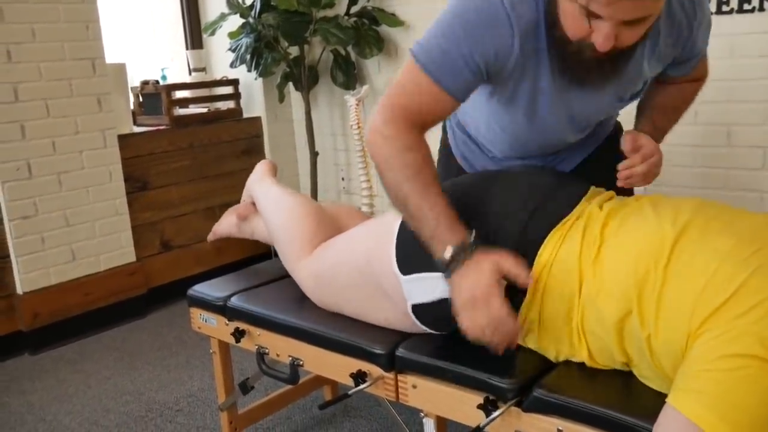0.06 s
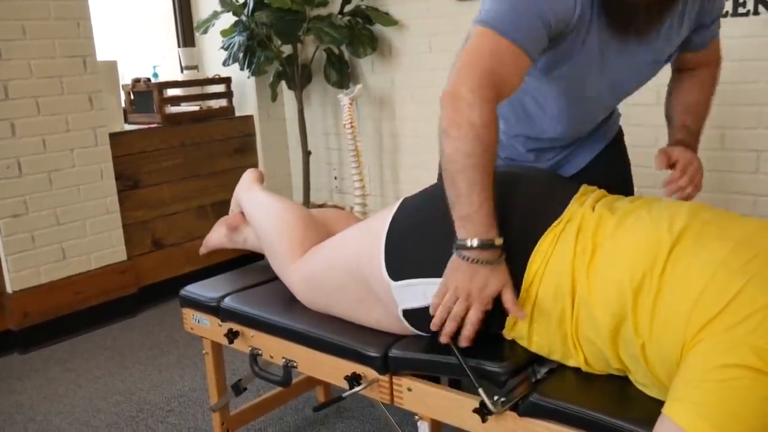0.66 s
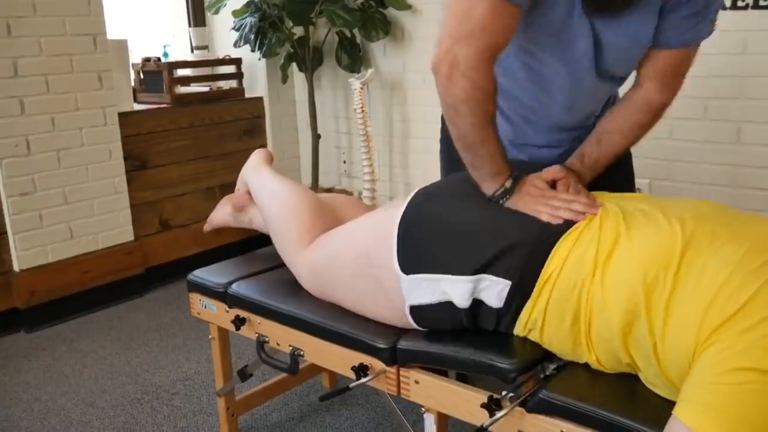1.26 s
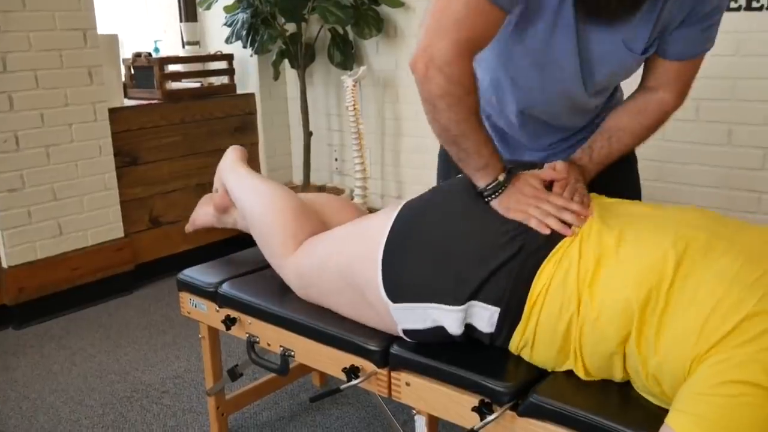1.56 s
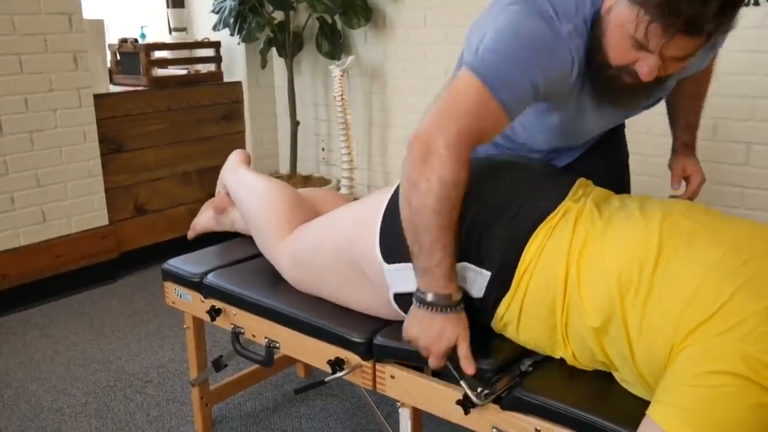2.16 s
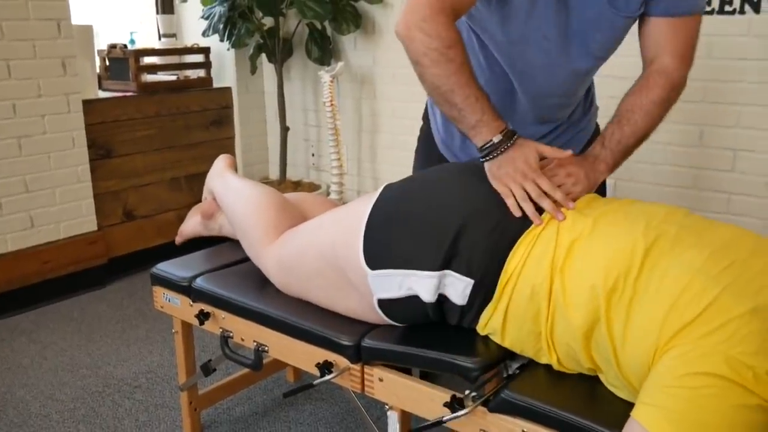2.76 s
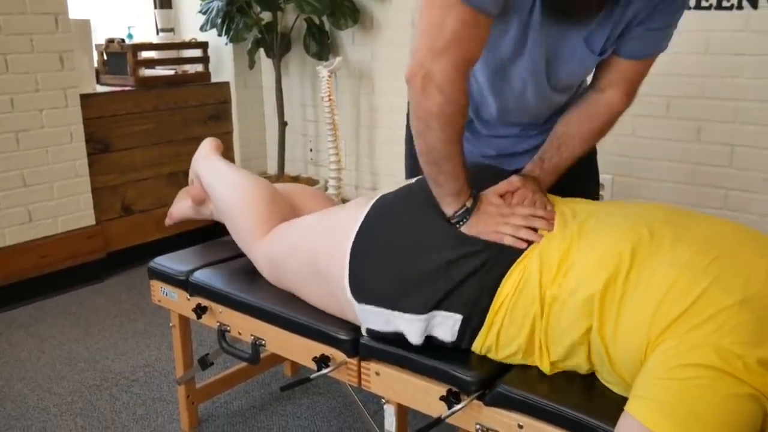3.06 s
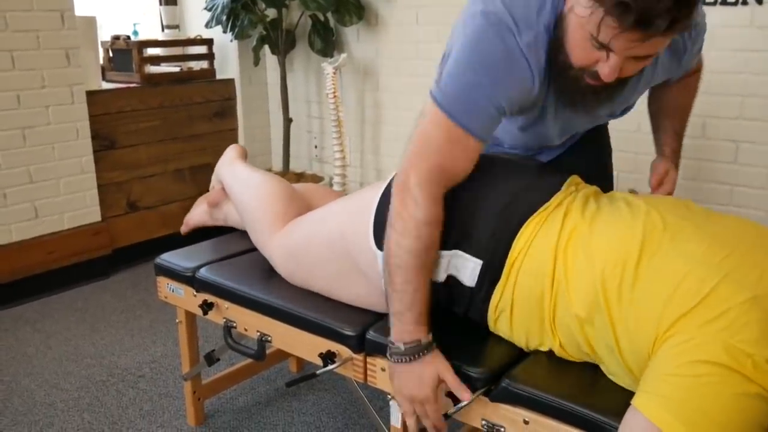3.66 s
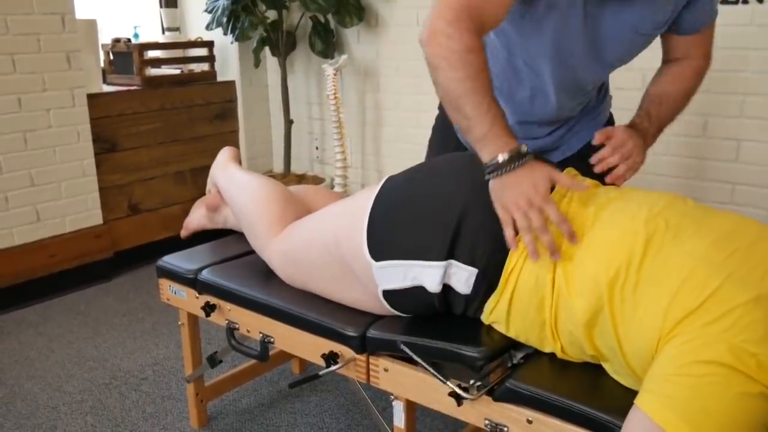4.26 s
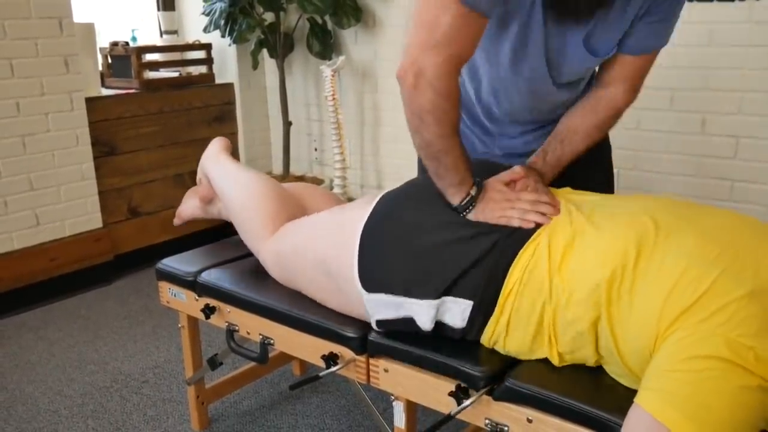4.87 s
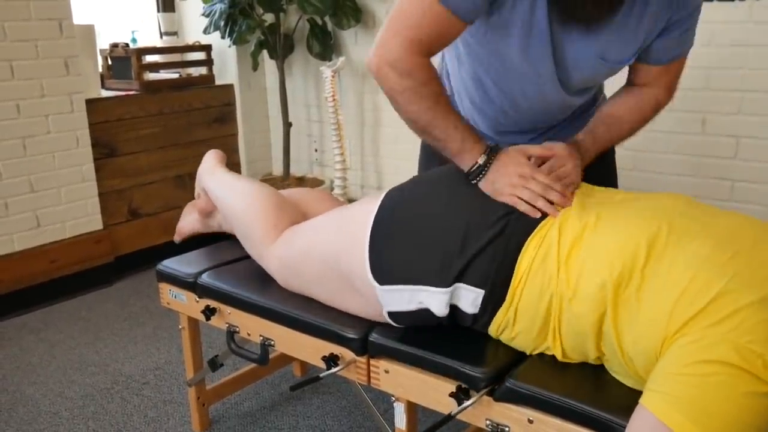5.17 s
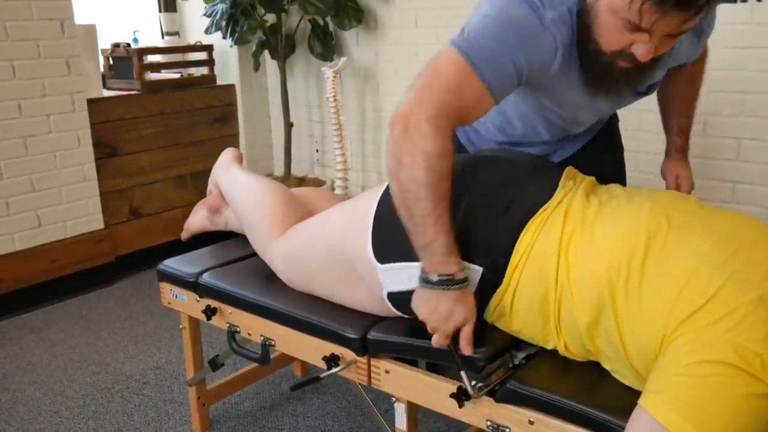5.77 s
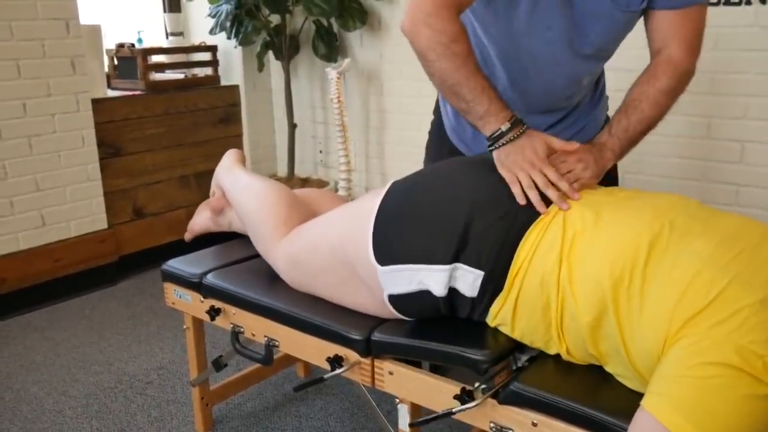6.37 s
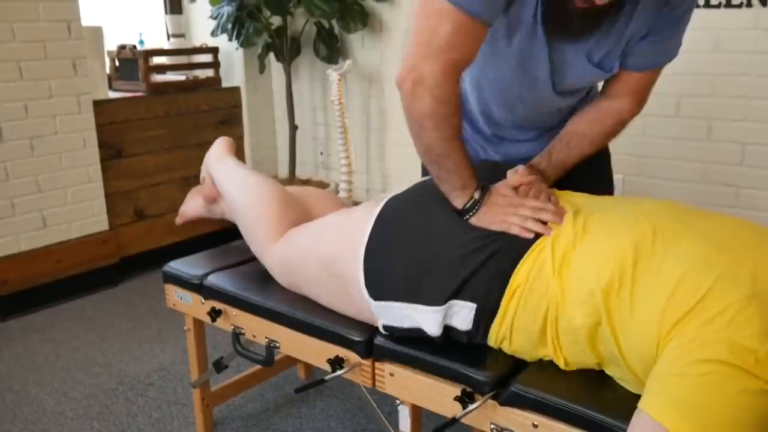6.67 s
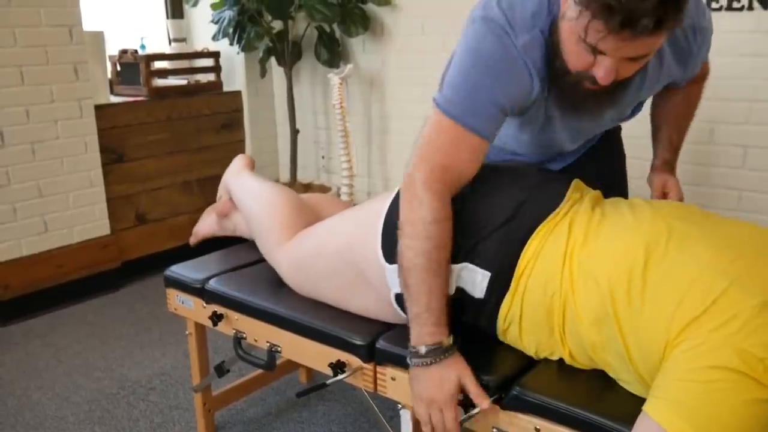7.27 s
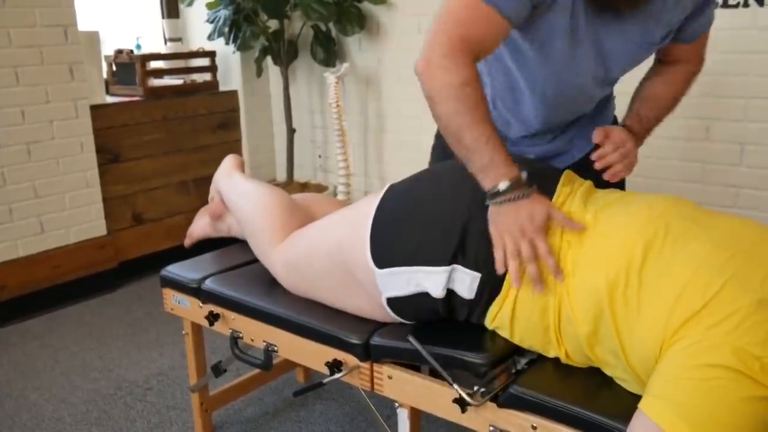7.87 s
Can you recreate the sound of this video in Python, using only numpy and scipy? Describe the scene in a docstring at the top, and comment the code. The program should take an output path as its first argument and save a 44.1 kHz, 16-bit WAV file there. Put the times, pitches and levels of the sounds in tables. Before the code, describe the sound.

A padded treatment table's drop section is cocked with a sharp clack, then thuds down under pressure, four times, in a quiet room.

```python
"""The drop section of a wooden treatment table is cocked and pushed down, again and again, in a small room.
A hand grips the lever and its joints click; the steel latch snaps and the pad knocks into its upper stop.
The freed lever falls back and bounces. A thrust then makes the catch give way, and the pad drops onto
the frame, which booms and shudders. Cloth rustles with the arms, and ventilation rumbles underneath.
The microphone's limiter turns the sound down for a moment after each drop."""
import sys
import numpy as np
from scipy import signal
from scipy.fft import rfft, irfft
from scipy.io import wavfile
from scipy.ndimage import uniform_filter1d

SR = 44100
rng = np.random.default_rng(int(sys.argv[2]) if len(sys.argv) > 2 else 0)


def int16_out(signal):
    """Quantize to a 16-bit WAV file."""
    q = np.round(np.clip(np.atleast_2d(signal).T, -1, 1) * 32767)
    wavfile.write(sys.argv[1], SR, q.astype(np.int16))


N = 352888
T = np.arange(SR) / SR  # the second that follows a blow

# a hand grips the lever: start_s, level_db, rattle_after_s
GRIPS = [(.362, 0, .049), (2.083, 0, .041), (3.816, 1.5, .044), (5.645, -1.5, .049), (7.472, 0.5, .041)]
# the pad is raised and latched: start_s, latch_db, brightness_db_per_octave, stop_after_s, stop_db
COCKS = [(0.5184, -3, 0.46, 0.012, -1.5), (2.2361, -1.5, -1, 0.015, -1.5), (3.9752, -3, 0.5, 0.017, -2),
         (5.7994, 0.5, -1.5, .0122, -1.5), (7.616, -6, 0.9, 0.012, -2)]
# the catch gives way, having ticked under the strain: start_s, level_db, tick_db
DROPS = [(1.3262, 3, -17), (3.0456, 5.5, -6.5), (4.861, 7, -8), (6.626, 5.5, -5.5)]
# tone colour of the pad hitting a stop: pitch_hz, strike_db, ring_db
STOP_COLOUR = [(80, 15, 16.5), (140, 29, 19.5), (245, 9.5, 29), (413, 25.5, 27), (516, 27, 31),
               (830, 8, 23), (1220, -0.5, 22.5), (1960, 8, 16.5), (3360, 25.5, 11.5), (4430, 9, 5.5),
               (5400, 20.5, 7.5), (7850, 9.5, -2.5), (10600, 1, -8), (15000, 0, -13)]
# Modes are the tones a struck part rings with: pitch_hz, level_db, ring_s (time to fade by 60 dB)
SPRING_MODES = [(4970, -45, 0.14), (5469, -49.5, 0.27), (6430, -57, 0.26), (7000, -56, 0.21),
                (7550, -54.5, 0.22)]  # the faint return spring
RAIL_MODES = [(135.6, -29, 0.74), (186, -30, 0.8), (443.7, -35, 0.31), (502, -28, 0.21), (735, -32.5, 0.37),
              (936, -35, 0.35), (1179, -28, 0.17), (1426, -24.5, 0.15)]  # the table's legs and rails
BOARD_MODES = [(345, -7.5, 0.033), (528, -8, 0.012), (683, -14, 0.048), (1097, -5.5, 0.035),
               (1320, -18.5, 0.021)]  # the pad's well damped wooden board
LEVER_MODES = [(608, -33, .42), (691, -32, .42), (796, -29, .42), (855, -32, .42), (990, -32, .4),
               (1114, -28, .42), (1162, -33, .42), (1219, -27, .42), (1289, -27, .42), (1415, -31, .39),
               (1607, -30, .35), (1703, -31, .34), (2079, -29, .29), (2581, -32, .24), (2656, -33, .24),
               (2703, -29, .23), (2756, -30, .23), (3270, -29, .2), (3754, -32, .18)]  # the steel lever's long tones
LEVER_CLANG = [(900, -22, 0.048), (1313, -21, 0.12), (1703, -23, 0.07), (2013, -19, 0.055),
               (2700, -14, 0.037), (3315, -9.5, 0.025), (3630, -21.5, 0.053), (3970, -26, 0.02),
               (5200, -26, 0.043)]  # the steel lever's short clang


def amp(db):
    """Turns decibels into a gain to multiply by."""
    return 10 ** (np.asarray(db) / 20)


def read(table, hz, column=1):
    """Looks up a table's value at any pitch, gliding between its rows."""
    table = np.array(table)
    return np.interp(np.log(hz + 1), np.log(table[:, 0] + 1), table[:, column])


def unit(x):
    """Scales a sound to an energy of one."""
    return x / np.linalg.norm(x)


def fade(ring_s):
    """A gain that falls by 60 dB in ring_s."""
    return np.exp(-np.log(1000) * T / ring_s)


def add(mix, start_s, sound):
    """Mixes a sound in at the given time."""
    part = mix[round(start_s * SR):][:len(sound)]
    part += sound[:len(part)]


def colour(x, db_of_hz):
    """Makes each pitch louder or softer, without letting anything sound ahead of a blow."""
    size = 2 * len(x)
    log_gain = np.log(amp(db_of_hz(abs(np.fft.fftfreq(size, 1 / SR)))))
    response = np.exp(np.conj(signal.hilbert(log_gain)))
    return irfft(rfft(x, size) * response[:len(x) + 1])[:len(x)]


def radiated(x, table, column):
    """Colours a vibration; the small treatment table gives off little deep bass."""
    return colour(x, lambda hz: read(table, hz, column) - 10 * np.log10(1 + (60 / (hz + 5)) ** 4))


def strike(table, contact_s):
    """Two parts chatter for a few milliseconds as they meet."""
    envelope = T / contact_s * np.exp(-T / contact_s)
    chatter = rng.standard_normal(SR) * envelope
    for _ in range(2):
        even = irfft(np.exp(1j * np.angle(rfft(chatter))), SR)  # all pitches equally strong
        chatter = even * np.sqrt(envelope)
    return radiated(unit(chatter), table, column=1)


def ring(table, stretch, rise_s):
    """Wood and room ring in a blur of tones; each pitch dies away at its own speed."""
    # how long they ring, before stretch multiplies it: pitch_hz, ring_s
    ring_times = [(100, 1), (300, 1), (600, 0.72), (1200, 0.51), (2500, 0.52), (4500, 0.36), (8000, 0.35),
                  (15000, 0.41)]
    hz, t, bands = signal.stft(rng.standard_normal(SR), SR, nperseg=256)
    rate = np.log(1000) / (stretch * read(ring_times, hz))[:, None]
    fading = bands * np.sqrt(2 * rate / SR) * np.exp(-rate * t)
    tail = signal.istft(fading, SR, nperseg=256)[1][:SR]
    return radiated(tail * (1 - np.exp(-T / rise_s)), table, column=-1)


def modes(table, rise_s):
    """The clear tones of a struck part, all set going by the same push."""
    tones = sum((-1) ** k * amp(db) * fade(ring_s) * np.sin(2 * np.pi * hz * T)
                for k, (hz, db, ring_s) in enumerate(table))
    return tones * (1 - np.exp(-T / rise_s))


def swell(peak_s, spread_s):
    """Noise that rises and falls in a bell curve."""
    return rng.standard_normal(SR) * np.exp(-.5 * ((T - peak_s) / spread_s) ** 2)


def play(blows, voice, fresh, ripple_db, delay_s=0):
    """Plays a voice at each blow (start_s, level_db, brightness_db_per_octave)."""
    out, usual = np.zeros(N), voice()
    grid_hz = np.linspace(0, SR / 2, num=260)
    treble = np.clip(grid_hz / 2500 - 1.2, 0, 1)
    ripple = ripple_db * rng.standard_normal(len(grid_hz)) * treble  # crowded high tones
    for s, db, brightness in blows:
        sound = (1 - fresh) * usual + fresh * voice()  # fresh is the share made anew each time
        tilt = lambda hz: brightness * np.log2(np.clip(hz, 250, 12000) / 1000)
        add(out, s + delay_s, colour(sound, lambda hz: db + tilt(hz) + np.interp(hz, grid_hz, ripple)))
    return out / np.hypot(1 - fresh, fresh)


def ventilation():
    """Moving air makes a low, gently wavering rumble and a faint hiss."""
    # tone colour of the air: pitch_hz, level_db
    air_colour = [(8.8, -21), (15, 4), (43, -25), (66, -7), (80, -14.5), (100, -6.5), (125, -15),
                  (195, -11.5), (269, -14.5), (330, -20), (361, -14.5), (442, -20.5), (592, -22.5),
                  (972, -29), (1340, -31), (3220, -42), (14200, -64.5), (16000, -62)]
    # slow drift of the rumble: time_s, boost_db
    drift = [(0, 8), (.35, 9), (.6, 4), (8, 1)]
    hz = np.fft.rfftfreq(N, 1 / SR)
    air = unit(irfft(rfft(rng.standard_normal(N)) * amp(read(air_colour, hz)), N))
    rumble = irfft(rfft(air) / (1 + (hz / 115) ** 6), N)
    drift_db = np.interp(np.arange(N) / SR, *np.transpose(drift))
    waver = unit(irfft(rfft(rng.standard_normal(N)) * (hz < 5), N)) * np.sqrt(N)
    return amp(-37.5) * np.sqrt(N) * (air - rumble + rumble * amp(drift_db + 2.6 * waver))


def rustle():
    """Cloth fibres slip in tiny uneven grains with every move of the arms."""
    # tone colour of cloth: pitch_hz, level_db
    cloth_colour = [(300, 10), (1500, 14), (4500, 13), (7000, 5.5), (10000, 2.5), (15000, -4)]
    out = np.zeros(N)
    moves = [(GRIPS, -.23, -70.5, .041),  # reaching down
             (COCKS, -.034, -60.5, .04),  # pulling the lever
             (DROPS, -.022, -51.5, .031),  # thrusting
             (DROPS, .39, -62.5, .072)]  # lifting off
    for events, after_s, db, spread_s in moves:
        peak_s = 3 * spread_s
        for s, *_ in events:
            grains = amp(3.5 * np.repeat(rng.standard_normal(SR // 100), 100))
            slips = colour(swell(peak_s, spread_s) * grains, lambda hz: read(cloth_colour, hz))
            add(out, max(s + after_s - peak_s, 0), amp(db) * slips)
    return out


def joint():
    """One of the lever's joints clicks lightly and shakes the spring."""
    # tone colour of the click: pitch_hz, strike_db, ring_db
    joint_colour = [(80.5, -1.5, 20), (153, 19.5, 22.5), (272, 5, 23), (406, 23.5, 23), (596, 7.5, 12.5),
                    (880, -11, 15), (1250, -1, 16.5), (1880, -11, 6), (3200, 3.5, 1), (4460, -3.5, -6),
                    (5770, -5, -8.5), (8000, -21.5, -30.5), (10800, -23.5, -33), (14900, -31, -46)]
    click = amp(-.5) * strike(joint_colour, contact_s=.0013)
    tail = amp(1) * ring(joint_colour, stretch=.74, rise_s=.0029)
    return click + tail + amp(-12.5) * modes(SPRING_MODES, rise_s=.001)


def joint_clicks():
    """The joints click whenever their load changes: gripped, let go, or strained by a thrust."""
    # the hand lets go: start_s, level_db, brightness_db_per_octave
    let_gos = [(.701, -12, -2.5), (2.398, -5, -1), (5.968, -14, 0), (7.792, -6, -0.8)]
    clicks = [(s, db, .95) for s, db, _ in GRIPS]
    rattles = [(s + after_s, db - 4.5, 1.4) for s, db, after_s in GRIPS]
    ticks = [(s - .042, tick_db, -3) for s, _, tick_db in DROPS]
    return play(clicks + rattles + let_gos + ticks, joint, fresh=.54, ripple_db=5.5)


def soft_knock():
    """A soft, woody knock sets the legs and rails ringing."""
    # tone colour of the knock: pitch_hz, strike_db, ring_db
    knock_colour = [(80, 8.5), (160, 19.5), (350, 10.5), (600, 14), (900, 7), (1350, 13), (2000, 6.5),
                    (3000, 1.5), (5000, -19), (9000, -24), (15000, -42)]
    knock = amp(-2) * strike(knock_colour, contact_s=.00396)
    tail = amp(1) * ring(knock_colour, stretch=.49, rise_s=.004)
    return knock + tail + amp(-4.5) * modes(RAIL_MODES, rise_s=.0035)


def knocks():
    """The hand lands, the cam (the lever's lifting piece) engages, the body settles after a drop."""
    # the hand lands softly on the lever: start_s, level_db, brightness_db_per_octave
    touches = [(2.0635, -11, -4), (5.5855, -14, -7.5)]
    engaging = [(s + .0125, db + 1.3, .9) for s, db, _ in GRIPS]
    settling = [(s + .298, db - 22, -7.5) for s, db, _ in DROPS]
    return play(touches + engaging + settling, soft_knock, fresh=.37, ripple_db=6)


def latch():
    """The steel latch springs in with a bright snap."""
    # tone colour of the snap: pitch_hz, level_db
    latch_colour = [(80, 3), (250, -20), (400, 22), (700, 9.5), (1300, 14.5), (2000, 13), (3000, 18),
                    (4200, 16.5), (5500, 9), (8500, 11.5), (11000, 5.5), (15000, -2)]
    # tones of the latch and its spring: pitch_hz, level_db, ring_s
    latch_modes = [(1810, -16.5, 0.12), (2470, -21, 0.048), (3630, -26.5, 0.064), (5160, -7, 0.025),
                   (5870, -16, 0.0087), (6560, -2.5, 0.0066), (6850, -12, 0.036), (9200, -7, 0.008),
                   (6650, -43, 0.45), (7050, -47.5, 0.55), (10010, -46, 0.35)]
    snap = amp(-3) * strike(latch_colour, contact_s=.0012) + amp(-6) * modes(latch_modes, rise_s=.00034)
    tail = amp(-2) * ring(latch_colour, stretch=.25, rise_s=.0011)
    return snap + tail + amp(14.5) * modes(SPRING_MODES, rise_s=.001)


def pad_stop():
    """The wooden pad knocks into its upper stop."""
    # tones of the pad with no weight on it: pitch_hz, level_db, ring_s
    pad_modes = [(133.5, -28, 0.71), (233, -24.5, 0.68), (310, -28, 1), (361, -37, 0.32),
                 (421.4, -24.5, 0.4), (497.4, -26.5, 0.74), (583, -19, 0.56), (591, -44, 0.27),
                 (1068, -17, 0.17), (1157, -16, 0.13), (1380, -39, 0.3), (1625, -17, 0.13),
                 (2254, -22.5, 0.2)]
    knock = amp(-3) * strike(STOP_COLOUR, contact_s=.002) + amp(-6.5) * modes(BOARD_MODES, rise_s=.00046)
    tail = amp(2) * ring(STOP_COLOUR, stretch=.78, rise_s=.00087)
    return knock + tail + amp(-5.5) * modes(pad_modes, rise_s=.00097)


def cocking():
    """The latch snaps, and just after it the pad reaches its stop."""
    snaps = [(s, db, brightness) for s, db, brightness, *_ in COCKS]
    stops = [(s + after_s, db, .33) for s, _, _, after_s, db in COCKS]
    return play(snaps, latch, fresh=.25, ripple_db=3.5) + play(stops, pad_stop, fresh=.4, ripple_db=3)


def echoed(x):
    """A sound bounces back from the floor and the nearest wall."""
    # first echoes: delay_s, gain
    echoes = [(.0058, 0.04), (0.0117, 0.1)]
    out = x.copy()
    for delay_s, gain in echoes:
        add(out, delay_s, gain * x)
    return out


def lever():
    """The steel lever chatters and clanks against the frame."""
    # tone colour of the clank: pitch_hz, strike_db, ring_db
    lever_colour = [(79.7, 2, 25), (160, -3, 28.5), (267, 19, 27.5), (372, 15, 27), (550, 18, 30),
                    (950, 29, 29), (1160, 33, 28.5), (1950, 25.5, 24.5), (2700, 23, 21), (4140, 19.5, 11.5),
                    (5400, 12.5, 3.5), (7760, -1, -11), (10300, -7, -21), (15000, -35, -29)]
    clank = amp(-10) * strike(lever_colour, contact_s=.0031) + amp(.5) * modes(LEVER_CLANG, rise_s=.002)
    tones = amp(-.3) * modes(LEVER_MODES, rise_s=.0007) + amp(.5) * modes(RAIL_MODES, rise_s=.008)
    spring = amp(-1) * modes(SPRING_MODES, rise_s=.001)
    tail = amp(-4.5) * ring(lever_colour, stretch=.81, rise_s=.0081)
    return echoed(clank) + tones + spring + tail


def releasing():
    """The freed lever falls back and bounces once, softer and duller."""
    # the lever lands: start_s, bounce_after_s
    lever_falls = [(.9975, .223), (2.6725, .219), (4.4575, .2205), (6.2685, .226)]
    falls = [(s, .34, .72) for s, _ in lever_falls]
    bounces = [(s + after_s, -9, -3.5) for s, after_s in lever_falls]
    return play(falls + bounces, lever, fresh=.11, ripple_db=1)


def catch():
    """The catch that holds the pad up gives way with a crack."""
    # tone colour of the crack: pitch_hz, level_db
    catch_colour = [(80, 12.5), (150, 28.5), (250, 35), (400, 29.5), (600, 15.5), (900, 15.5), (1300, 18.5),
                    (2000, 13.5), (3000, 13), (4200, 12), (5500, 9.5), (8000, -2), (11000, 0), (15000, -8)]
    crack = strike(catch_colour, contact_s=.0029)
    tail = amp(4.5) * ring(catch_colour, stretch=.4, rise_s=.0059)
    return crack + tail + amp(-5) * modes(LEVER_CLANG, rise_s=.003)


def thud(hz, swell_s):
    """The pad gives the air one heavy push that dies away quickly."""
    return T / swell_s * np.exp(1 - T / swell_s) * np.sin(2 * np.pi * hz * T)


def landing():
    """The loaded pad crashes onto the frame and jolts the lever."""
    # tone colour of the crash: pitch_hz, strike_db, ring_db
    crash_colour = [(74, 14, 27.5), (139, 30.5, 34.5), (245, 41.5, 26.5), (396, 28, 27), (625, 38, 32.5),
                    (820, 2.5, 25), (1110, 17, 27.5), (1960, 7.5, 22.5), (3340, 20, 18), (4400, 7, 8),
                    (5200, 12, 10), (8000, 7, 1.5), (10300, 10, -4), (15000, -18, -21)]
    # tones of the loaded frame: pitch_hz, level_db, ring_s
    frame_modes = [(105.5, -41, 0.79), (138.2, -23, 0.84), (182.2, -11, 0.57), (230, -17, 0.8),
                   (273, -26.5, 0.76), (320.4, -21, 0.78), (357, -25, 0.93), (398, -29, 1),
                   (570, -31.5, 0.74), (650, -57, 0.36)]
    crash = amp(-.5) * strike(crash_colour, contact_s=.0038) + amp(-3) * modes(LEVER_CLANG, rise_s=.0055)
    tones = amp(-2) * modes(frame_modes, rise_s=.0044) + amp(-5) * modes(LEVER_MODES, rise_s=.0033)
    return crash + tones + ring(crash_colour, stretch=.98, rise_s=.0043)


def shudder():
    """The frame goes on trembling as the body rebounds on the cushion."""
    # tone colour of frame and cushion: pitch_hz, level_db
    shudder_colour = [(100, -27), (190, 34.5), (250, 32.5), (390, 30), (540, 16), (900, 4), (1600, 5),
                      (3200, 0.5), (5000, -10), (9000, -25.5), (15000, -35.5)]
    return radiated(unit(swell(peak_s=.19, spread_s=.12)), shudder_colour, column=1)


def weight():
    """The body's weight: a thud on the catch, a woody clunk as the pad hits bottom, then a shudder."""
    thud_ahead_s, bottom_after_s = .0016, .0158
    out = np.zeros(N)
    for s, db, _ in DROPS:
        clunk = amp(-2.5) * thud(hz=314, swell_s=.0013) + amp(2.5) * modes(BOARD_MODES, rise_s=.00091)
        knock = amp(-4.5) * strike(STOP_COLOUR, contact_s=.0018)
        add(out, s - thud_ahead_s, -amp(db - 4.5) * thud(hz=169.6, swell_s=.0036))
        add(out, s + bottom_after_s, amp(db) * (knock - clunk))
        add(out, s, amp(db + 1.1) * shudder())
    return out


def dropping():
    """The catch cracks and, after a short fall, the pad lands under the body's weight."""
    blows = [(s, db, -.4) for s, db, _ in DROPS]
    cracks = play(blows, catch, fresh=.4, ripple_db=1.5)
    landings = play(blows, landing, fresh=.25, ripple_db=2, delay_s=.0105)
    return cracks + landings + weight()


def stereo(mono):
    """The sound is nearly mono; a faint left-right difference widens the treble."""
    # how much left and right differ: pitch_hz, difference_db
    spread = [(60, -55), (1000, -58), (2000, -52), (4000, -39), (8000, -31), (14000, -15)]
    scatter = unit(rng.standard_normal(SR) * fade(ring_s=.0021))
    side = signal.oaconvolve(mono, colour(scatter, lambda hz: read(spread, hz)))[:N]
    return np.array([mono + side, mono - side])


def scene():
    """Grip, cock, release, drop; all heard from one spot."""
    table_sounds = joint_clicks() + knocks() + cocking() + releasing() + dropping()
    return stereo(table_sounds + rustle() + ventilation())


def record(dry):
    """A limiter turns loud moments down fast and recovers slowly; peaks clip, the top treble is cut."""
    limit_db, recovery_db_per_s, cutoff_hz = -6, 17.7, 16100
    power = uniform_filter1d((dry ** 2).mean(0), size=130)
    power_db = 10 * np.log10(abs(power) + 1e-12)
    recovery_db = np.arange(N) / SR * recovery_db_per_s
    held_db = np.maximum.accumulate(power_db + recovery_db) - recovery_db
    cut_db = uniform_filter1d(np.maximum(held_db - limit_db, 0), size=60)
    limited = np.clip(dry / amp(cut_db), -1, 1)
    treble_cut = signal.firwin(511, cutoff_hz, window=("kaiser", 9), fs=SR)
    return signal.oaconvolve(limited, treble_cut[None], "same")


dry = scene()
out = record(dry)
int16_out(out)
```